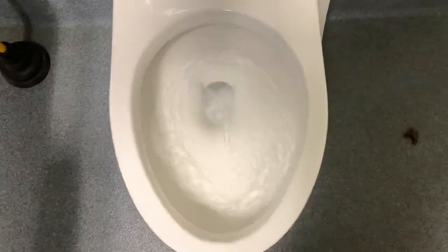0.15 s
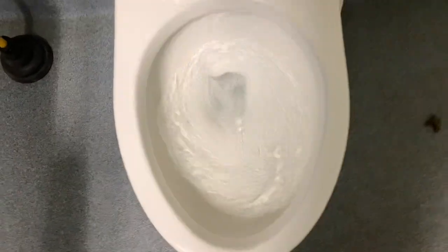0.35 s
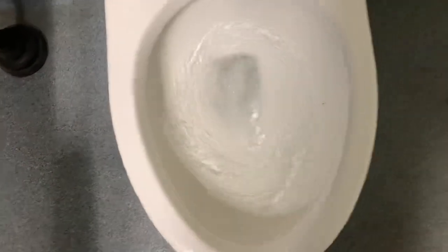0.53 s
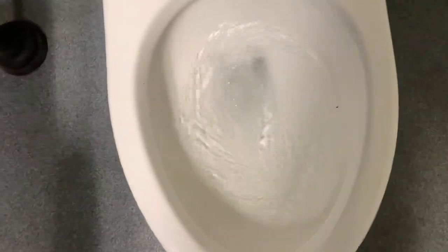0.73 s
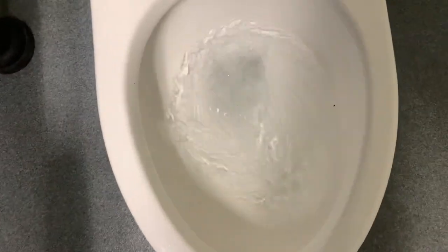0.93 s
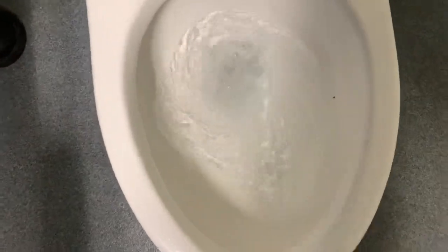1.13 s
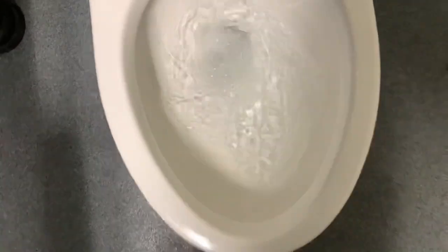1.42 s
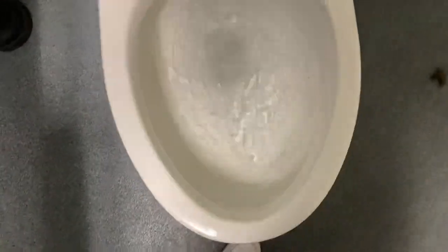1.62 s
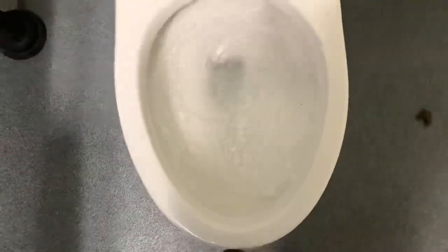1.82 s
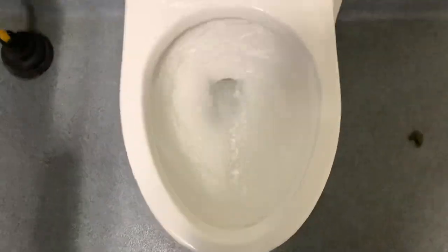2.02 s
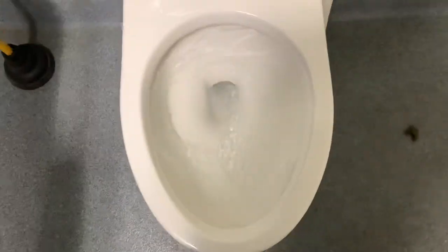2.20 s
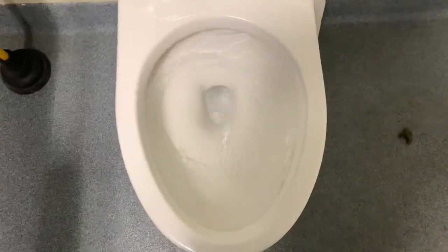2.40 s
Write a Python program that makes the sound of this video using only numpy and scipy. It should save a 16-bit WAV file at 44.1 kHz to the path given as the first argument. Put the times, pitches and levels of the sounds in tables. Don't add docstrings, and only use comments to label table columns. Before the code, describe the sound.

Close toilet flush: hollow air bubbles gurgle in the bowl, water hisses in sheets, the handle clacks twice, pipes rumble, and the trap empties in crowded glugs before the jets surge, in a small echoing bathroom.

```python
import sys
import numpy as np
from scipy import signal
from scipy.fft import rfft, irfft, next_fast_len
from scipy.io import wavfile

SR = 44100
rng = np.random.default_rng(int(sys.argv[2]) if len(sys.argv) > 2 else 0)


def master_out(mix):
    frames = np.transpose(np.atleast_2d(mix))
    ceiling = np.clip(frames, -1, 1)
    pcm = np.round(ceiling * 32767).astype(np.int16)
    wavfile.write(sys.argv[1], SR, pcm)


def linear_from_db(decibels):
    return 10 ** (np.asarray(decibels, float) / 20)


N = 112454


def rms_one(x):
    return x / np.sqrt(np.mean(x ** 2) + 1e-20)


def in_time(rows):
    s, *columns = np.transpose(rows)
    return [np.interp(np.arange(N) / SR, s, c) for c in columns]


def at_hz(points, hz):
    table_hz, value = np.transpose(points)
    return np.interp(np.log(hz), np.log(table_hz), value)


def drift(rate_hz):
    r = np.exp(-80 * np.pi * rate_hz / SR)
    slow = signal.lfilter([1], [1, -2 * r, r * r], rng.standard_normal(N // 40 + 2002))[2000:]
    return np.interp(np.arange(N) / 40, np.arange(len(slow)), rms_one(slow))


def ring(clicks, hz, t60_s):
    r, w = linear_from_db(-60 / (t60_s * SR)), 2 * np.pi * hz / SR
    return signal.lfilter([0, np.sin(w)], [1, -2 * r * np.cos(w), r * r], clicks + 1e-18)


def resonance(x, hz, width_hz):
    r = np.exp(-np.pi * width_hz / SR)
    b = np.array([1, 0, -1]) * (1 - r * r) / 2
    return signal.lfilter(b, [1, -2 * r * np.cos(2 * np.pi * hz / SR), r * r], x)


def butter(x, hz, kind):
    return signal.sosfilt(signal.butter(2, hz, kind, fs=SR, output="sos"), x)


# f/Hz, likeness [0-1]
STEREO_LIKENESS = [(40, 0.87), (300, 0.81), (700, 0), (1500, 0), (4000, 0.14), (6500, 0.8), (8000, 0.7),
                   (16000, 1)]


def banded_noise(spectrum, patchy_db, tilt_db=0):
    out, together = 0, drift(6)
    edges = 24 * 2 ** np.arange(0, 9.6, .5)
    white = rng.standard_normal((2, 2, N))
    for k, (low, high) in enumerate(zip(edges, edges[1:])):
        hz = np.sqrt(low * high)
        if not spectrum[0][0] * .7 < hz < spectrum[-1][0] * 1.4:
            continue
        mid, side = butter(white[k % 2], [low, high], "band")
        alike = np.clip(at_hz(STEREO_LIKENESS, hz), 0, 1)
        flicker_db = patchy_db * (0.21 * together + drift(34))
        gain = linear_from_db(at_hz(spectrum, hz) + tilt_db * np.log2(hz / 5000) + flicker_db)
        out = out + gain * (np.sqrt(1 + alike) * mid + np.sqrt(1 - alike) * side * [[1], [-1]])
    return rms_one(out)


def grains(per_s, spread_db, low_hz, high_hz, cycles):
    sizes = linear_from_db(spread_db * np.minimum(rng.exponential(1, N), 4)) * rng.choice([-1, 1], N)
    born, dealt = rng.random(N) < per_s / SR, rng.integers(0, 24, N)
    out = 0
    for k, hz in enumerate(np.geomspace(low_hz, high_hz, 24)):
        bubbles = ring(sizes * born * (dealt == k), hz, cycles / hz)
        out = out + resonance(bubbles, hz, hz * 0.17)
    return rms_one(out)


def bubble_tones(rows, cycles, gain_db):
    out, t = np.zeros(N + SR), np.arange(SR // 16) / SR
    for s, db, hz in rows:
        life = t * hz / cycles / 2
        shape = (1 - np.exp(-(t / 0.0021) ** 2)) * linear_from_db(-60 * life)
        tone = np.sin(2 * np.pi * hz * t * (0.9536 + 0.12 * life))
        i = int(s * SR)
        out[i:i + len(t)] += linear_from_db(db + gain_db) * 1.53 * shape * tone
    return out[:N]


# t/s, peak level/dB, f/Hz
POCKETS = [(0.004, -20.5, 720), (0.054, -17.5, 650), (0.067, -16, 730), (0.083, -21.5, 640),
           (0.091, -23.5, 715), (0.124, -22, 746), (0.19, -15.5, 670), (0.202, -26, 352), (0.228, -23, 760),
           (0.259, -20, 1163), (0.267, -17.5, 1170), (0.268, -12.5, 715), (0.289, -22, 590),
           (0.306, -35, 700), (0.329, -24, 700), (0.33, -29, 490), (0.349, -28, 626), (0.366, -18.5, 630),
           (0.378, -17.5, 624), (0.394, -24, 624), (0.524, -18.5, 720), (0.558, -19.5, 634),
           (0.606, -29.5, 417), (0.643, -35, 398)]
# t/s, peak level/dB, f/Hz
GULPS = [(1.62, -22.5, 608), (1.636, -18.5, 613), (1.69, -17.5, 614), (1.698, -12.5, 679),
         (1.706, -13, 600), (1.724, -15.5, 700), (1.735, -15, 715), (1.763, -16.5, 607), (1.772, -19, 603),
         (1.8, -14, 670), (1.82, -10.5, 743), (1.846, -5, 724), (1.859, -9, 725), (1.885, -10, 628),
         (1.899, -18, 465), (1.9, -9.5, 1140), (1.915, -10.5, 1140), (1.918, -11, 764), (1.956, -6.5, 657),
         (1.959, -12.5, 1123), (1.966, -19, 1152), (1.978, -7.5, 732), (1.987, -9, 775),
         (1.996, -19.5, 449), (2.002, -8.5, 1127), (2.006, -4.5, 777), (2.023, -14, 666), (2.034, -7, 707),
         (2.046, -10.5, 640), (2.068, -17, 464), (2.09, -17, 535), (2.103, -13.5, 667), (2.109, -11.5, 800),
         (2.119, -17, 768), (2.132, -15.5, 607), (2.139, -15.5, 635), (2.217, -12, 705),
         (2.229, -12.5, 1120), (2.231, -14.5, 465), (2.264, -25, 600), (2.272, -18, 1110),
         (2.272, -16.5, 552), (2.292, -19, 465), (2.324, -11, 1214), (2.325, -5, 728), (2.334, -18, 1260),
         (2.344, -13, 1105), (2.353, -10, 663), (2.366, -24, 740), (2.384, -24, 754), (2.395, -24, 850),
         (2.422, -19, 420), (2.429, -19.5, 485), (2.463, -14.5, 730), (2.487, -16.5, 816),
         (2.501, -19, 673), (2.528, -19, 660), (2.537, -16, 780)]
# t/s, peak level/dB, f/Hz
DROPS = [
    (0.211, -19, 1172),
    (0.2578, -28, 1168),
    (1.569, -22, 1280),
    (1.734, -40, 1560),
    (1.8114, -26, 1300),
    (1.8651, -24, 1200),
    (1.9602, -12.5, 1215),
    (2.2737, -13, 1120),
    (2.3254, -13.5, 1303),
]
# t/s, peak level/dB, f/Hz
SPLASHES = [
    (1.6237, -22.5, 2240),
    (2.1081, -31, 2320),
    (2.339, -15, 2420),
]
# t/s, peak level/dB, f/Hz
GLUGS = [
    (0.039, -29, 375),
    (0.114, -24, 388),
    (0.238, -27, 390),
    (0.279, -26.5, 347),
    (0.368, -24.5, 420),
    (0.414, -27, 390),
    (1.441, -24.5, 426),
    (2.469, -17.5, 343),
]


def air_pockets():
    pockets = bubble_tones(list(POCKETS) + list(GULPS), 9.97, 7.5)
    drops = bubble_tones(list(DROPS) + list(SPLASHES), 51, -2.5)
    return pockets + drops + bubble_tones(GLUGS, 7, 4)


# f/Hz, width/Hz, level/dB
BOWL_MODES = [(364, 108, -5), (536, 75, -2.5), (620, 104, -2.2), (760, 257, -2.5), (1120, 155, -0.5),
              (1280, 513, -6.5), (1427, 400, -4.5), (1820, 1050, -22)]


def ring_bowl(x):
    modes = 0
    for k, (hz, width_hz, db) in enumerate(BOWL_MODES):
        mode = resonance(resonance(x, hz, 2 * width_hz), hz, width_hz)
        modes = modes + linear_from_db(db) * (-1) ** k * mode
    return rms_one(modes)


# t/s, level/dB, froth brightness/dB
GURGLE = [(0.0, -26, 8), (0.28, -24, -3.5), (0.41, -26.5, 5), (0.45, -29, -30), (0.64, -35, -24.5),
          (1.08, -44, -24), (1.4, -35.5, 9.5), (1.6, -37.5, 14.5), (1.7, -33.5, 15), (1.8, -20.5, -1.5),
          (1.88, -20, 6.5), (2.05, -19.5, 4.5), (2.15, -21.5, 12.5), (2.2, -24, 5.5), (2.23, -12, -7.5),
          (2.34, -22.5, 13.5), (2.4, -20, 10), (2.55, -21, 4)]


def gurgle():
    level_db, bright_db = in_time(GURGLE)
    clumped_per_s = 720 * linear_from_db(3.5 * drift(20))
    small = ring_bowl(grains(clumped_per_s, 4, 273.2, 1526, 15.5))
    froth = ring_bowl(rng.standard_normal(N) * linear_from_db(3.3 * drift(26)))
    top = butter(froth, 1300, "high")
    wash = small + linear_from_db(-7) * (froth + linear_from_db(bright_db + 7.0) * top)
    return linear_from_db(level_db - 4.0) * wash + air_pockets()


# t/s, level/dB, brightness/dB per octave
JETS = [(0.0, -44, 0.5), (0.19, -43, 1.3), (0.23, -43.5, -4.5), (0.32, -49.5, 2.5), (0.35, -37.5, -2),
        (0.6, -35.5, -2), (0.94, -37, -1), (0.98, -40.5, 0), (1.1, -38, -2.5), (1.3, -40, -5),
        (1.45, -33, -3), (1.6, -34, 0), (2.0, -35.5, 2), (2.3, -37.5, 2.5), (2.45, -29.5, -1.7),
        (2.55, -27, -2)]
# f/Hz, level/dB per Hz
SHEET = [(300, -22), (1000, -7), (2000, -10), (3200, -2.5), (4200, -3.5), (6660, -3), (11000, -1.5),
         (16000, -4)]
# f/Hz, level/dB
OVERTONES = [
    (4720, -0.5),
    (10740, -9),
]


def jets():
    level_db, tilt_db = in_time(JETS)
    sheet = banded_noise(SHEET, 1.43, tilt_db)
    whistle, width_hz = 0, 200
    for hz, db in [(6862, 2.5)] + list(OVERTONES):
        narrow = resonance(resonance(rng.standard_normal(N), hz, width_hz), hz, width_hz)
        whistle = whistle + linear_from_db(db) * rms_one(narrow)
    t = np.arange(N) / SR
    fade = np.clip((t - .3) * 10, 0, 1) * np.clip((.98 - t) * 10, 0, 1)
    return linear_from_db(level_db + 7.0) * sheet + linear_from_db(-47 + 2.8 * drift(18)) * whistle * fade


# t/s, peak level/dB, low weight/dB
CLACKS = [
    (0.1605, -22, -12),
    (1.1146, -5, -14),
    (1.2312, -8, -2),
    (2.2029, -22, -12),
]
# f/Hz, level pressed/dB, level released/dB, t60/s
HANDLE_MODES = [(539, -17, 2.5, 0.081), (930, -33, 0.5, 0.05), (1420, -6, -1.5, 0.13), (2050, -9, 2.5, .12),
                (2220, -7, -9, 0.084), (2547, -21, -13, 0.1), (2774, -1, -19, 0.072),
                (3770, -1, -19, 0.085), (4120, 1, -1, 0.072), (5071, -18, -12, 0.081),
                (5900, -32, -3, 0.092), (6282, -7, -10, 0.066), (10240, 7, -9, 0.037),
                (11500, 1, -17, 0.074)]
# f/Hz, level/dB per Hz
CRACK = [(150, -3.5), (837, -3), (2100, 5.5), (4500, 1), (7300, -3), (10400, -8.5), (16000, -9)]


def handle():
    t, snap, crack, thud = np.arange(N) / SR, 0, 0, 0
    hits = np.zeros((len(HANDLE_MODES), N))
    scatter_db = rng.normal(0, 1.7, (len(CLACKS), len(HANDLE_MODES)))
    for (s, db, low_db), own_db in zip(CLACKS, scatter_db):
        tick = db < -15
        after = np.maximum(t - s, 0) * (3.5 if tick else 1)
        rise = linear_from_db(db) * (1 - np.exp(-after / 0.00095))
        shape = rise * (linear_from_db(-8.5 - 60 * after / 0.14) + linear_from_db(-16.5 - 60 * after / 0.73))
        spike = (after > 0) * linear_from_db(db - 3 - 60 * after / .006)
        snap = snap + rise * linear_from_db(-0.5 - 60 * after / 0.031) + spike
        crack = crack + shape
        thud = thud + linear_from_db(low_db - 16) * shape
        column = 2 if low_db > -5 else 1
        mode_db = [mode[column] for mode in HANDLE_MODES]
        hits[:, int(s * SR)] = linear_from_db(db - 12.5 - 10 * tick + own_db + mode_db)
    rings = sum(ring(h, hz, t60_s) for h, (hz, _, _, t60_s) in zip(hits, HANDLE_MODES))
    low = rms_one(resonance(rng.standard_normal(N), 346, 540))
    bright = butter(rng.standard_normal(N), [1100, 14500], "band")
    noisy = crack * banded_noise(CRACK, 0.47) + snap * bright
    hollow = noisy - resonance(noisy, 3200, 600)
    return hollow + rings + 3 * thud * low


# t/s, level/dB
SWELL = [
    (0.0, -46.5),
    (0.4, -55),
    (1.05, -54),
    (1.15, -43.5),
    (1.3, -35),
    (1.52, -41.5),
    (1.62, -47.5),
    (2.38, -48),
    (2.48, -43),
]
# f/Hz, level/dB per Hz
RUMBLE = [(25, 14), (45, 2.5), (75, 3.5), (125, 0.8), (200, -8.5), (350, -6.5), (480, -7)]
# f/Hz, width/Hz, level/dB
PIPES = [(73, 7.3, 0.5), (128, 19, 5), (350, 60, 15)]


def pipe_rumble():
    rush = linear_from_db(in_time(SWELL)[0] - 1.0) * banded_noise(RUMBLE, 0.86)
    return rush + sum(linear_from_db(db) * resonance(rush, hz, width_hz) for hz, width_hz, db in PIPES)


def bathroom(x):
    t60_s, wall_hz = 0.52, 3380
    out, dull = np.zeros((2, N)), np.exp(-2 * np.pi * wall_hz / SR)
    for k, lag in enumerate((rng.uniform(.008, .03, 12) * SR).astype(int)):
        loop, gain, state = x.copy(), linear_from_db(-60 * lag / SR / t60_s), [0.]
        for i in range(lag, N, lag):
            back, state = signal.lfilter([gain * (1 - dull)], [1, -dull], loop[i - lag:i], zi=state)
            loop[i:i + lag] += back[:N - i]
        out[k % 2] += (loop - x) * (-1) ** (k // 2)
    return out


# f/Hz, width/Hz, level/dB
DRONE = [(74.5, 25, -52), (132, 19, -58.5), (208.6, 4.5, -53), (265, 4.2, -67.5), (367, 29, -49.5),
         (401, 53, -51.5)]


def drone():
    out = 0
    for hz, width_hz, db in DRONE:
        out = out + linear_from_db(db) * rms_one(resonance(rng.standard_normal(N), hz, width_hz))
    return out


def scene():
    bowl = gurgle()
    panned = bowl * linear_from_db([[1.47], [-1.47]])
    return panned + linear_from_db(-11.5) * bathroom(bowl) + jets() + handle() + pipe_rumble() + drone()


# f/Hz, lead/radians
PORT_LEAD = [(100, .05), (1290, .3), (3100, .9), (5500, 1.5), (7600, 1.3), (8500, 3.1), (9250, 4.7),
             (11000, 6.3), (12450, 7.85), (13500, 9.4), (14600, 11.0), (15600, 12.6)]


def two_ports(x):
    size = next_fast_len(N + 4096)
    turn = at_hz(PORT_LEAD, np.arange(size // 2 + 1) * SR / size + 1) / 2
    return irfft(rfft(x, size) * np.exp(1j * turn * np.array([[1], [-1]])), size)[:, :N]


def joint_treble(x):
    from_hz, band_hz, top_hz, scatter_db = 7700, 345, 15800, 3.5
    hz, _, z = signal.stft([x[0] + x[1], x[0] - x[1]], SR, nperseg=2048, noverlap=1024)
    band = (hz // band_hz).astype(int)
    starts = np.flatnonzero(np.diff(band, prepend=-1))
    power = np.add.reduceat(abs(z) ** 2, starts, axis=1)[:, band]
    chance = linear_from_db(2 * scatter_db * rng.standard_normal((band[-1] + 1, z.shape[-1]))[band])
    share = np.array([.75, .25])[:, None, None]
    keep = power > power[::-1] * share * chance
    keep[:, hz > top_hz] = False
    kept = z * (keep | (hz[:, None] < from_hz))
    mid, side = signal.istft(kept, SR, nperseg=2048, noverlap=1024)[1][:, :N]
    return np.array([mid + side, mid - side]) / 2


def roll_off(x):
    return signal.sosfilt(signal.butter(12, 17090, fs=SR, output="sos"), x)


def record(dry):
    wet = two_ports(butter(dry, 38, "high"))
    rounded = 1.178 * np.tanh(wet / 1.42)
    return roll_off(joint_treble(rounded))


dry = scene()
out = record(dry)
master_out(out)
```